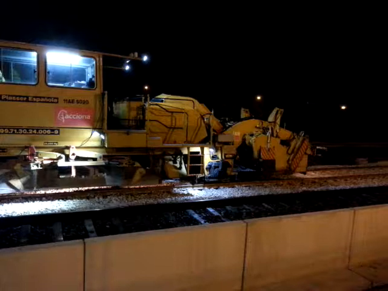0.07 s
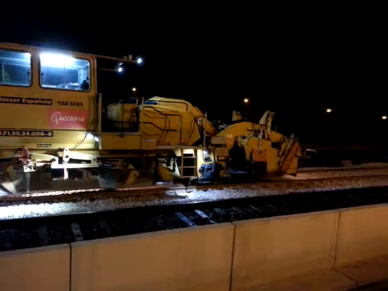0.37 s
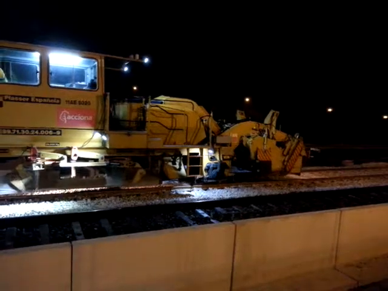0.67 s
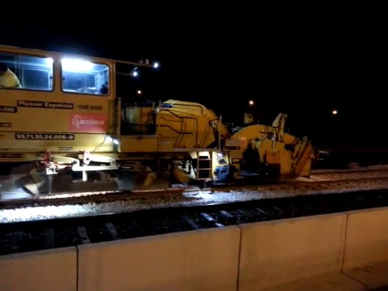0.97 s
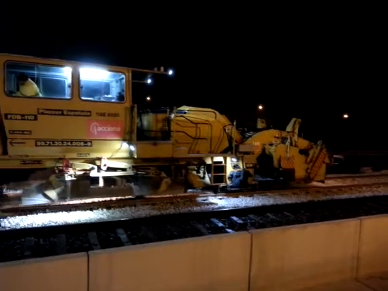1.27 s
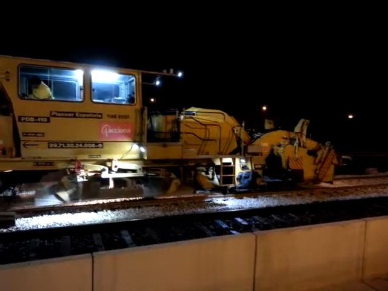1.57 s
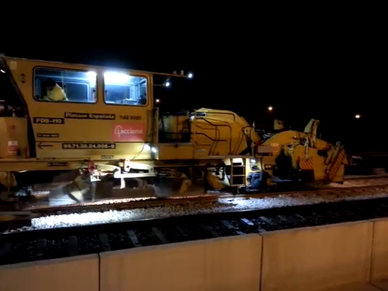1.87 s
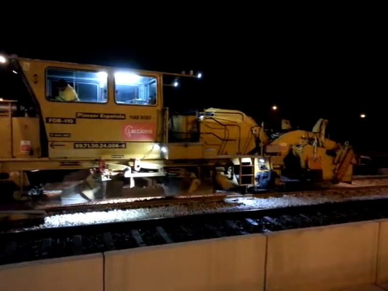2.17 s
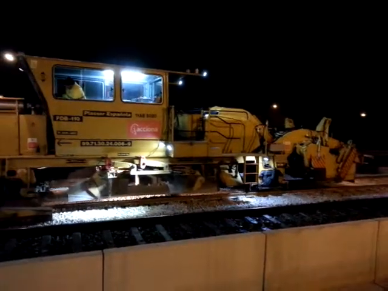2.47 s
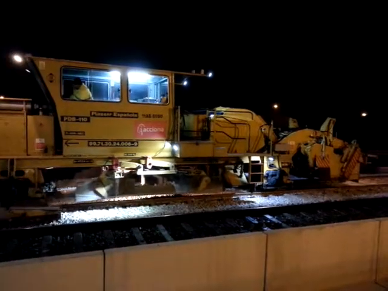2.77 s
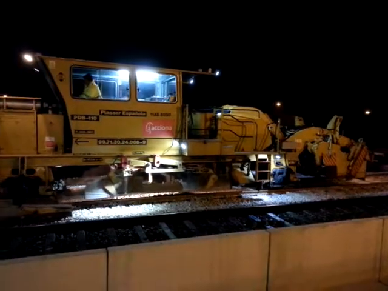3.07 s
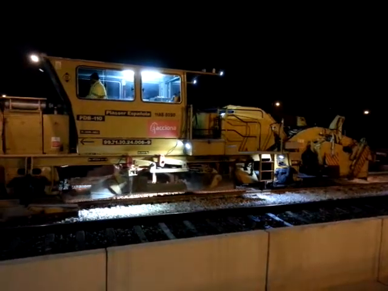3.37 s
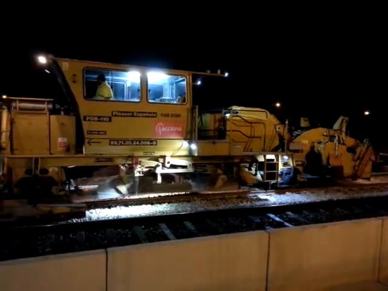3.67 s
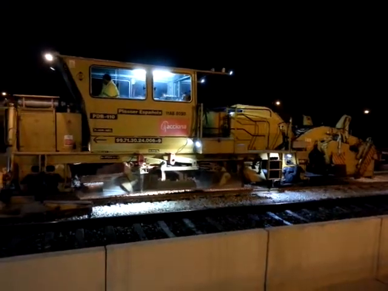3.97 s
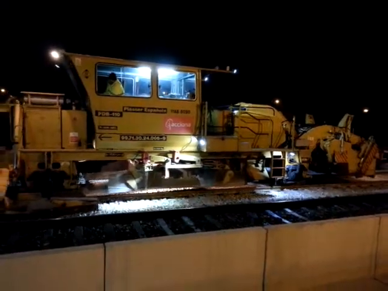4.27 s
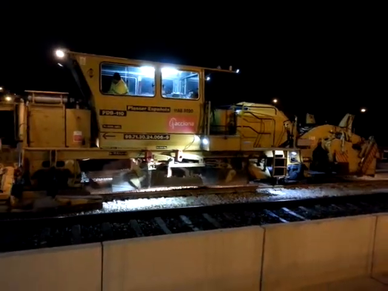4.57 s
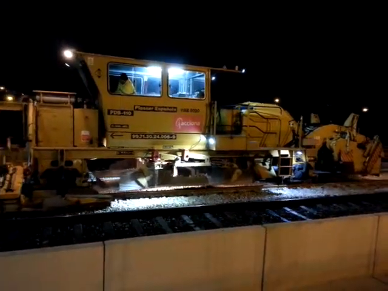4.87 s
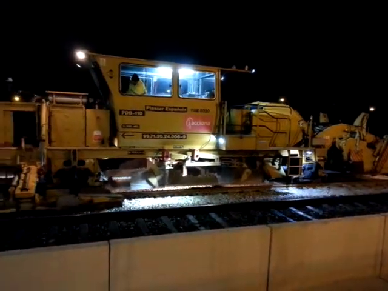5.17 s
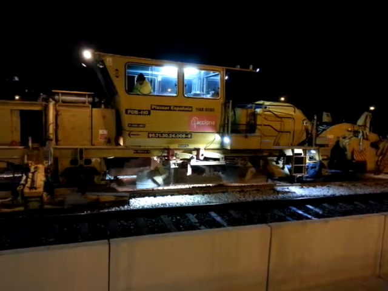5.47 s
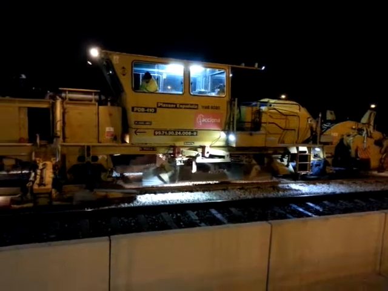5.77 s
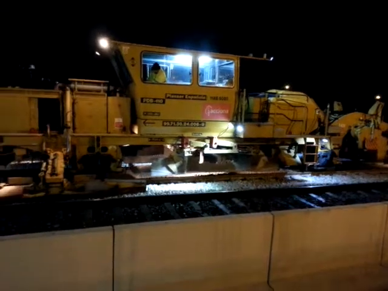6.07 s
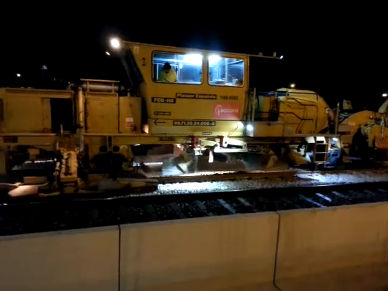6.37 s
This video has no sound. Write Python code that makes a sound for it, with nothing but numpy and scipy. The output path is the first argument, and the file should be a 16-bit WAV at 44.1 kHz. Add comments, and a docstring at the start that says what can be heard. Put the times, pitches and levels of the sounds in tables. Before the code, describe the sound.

After silence, a ballast sweeping machine fades in quickly at about 0.6 seconds and stays loud until the end at around 6.5 seconds. Its diesel runs at a steady speed, knocking and ticking, with wavering gear whine and humming pumps. A rotary brush flings stones into a steel hood, making a dense roar with a bright spray on top. From 1 second a hydraulic hiss crests, then dies away over the next two seconds. Larger stones thump and clank irregularly, hardest near 1.8 seconds and in a cluster around 3. Short scrapes on steel come near 1.2, 4.2 and 5.7 seconds. The hood booms near 3.5 seconds, and deep tumbling swells around 3 and 4.4. Cooling air sings hoarsely in a grille, strongest at 6 seconds as the engine draws level. The sound is outdoors, in stereo, drifting slightly toward the middle, with clipping on the peaks.

```python
"""A ballast sweeper creeps past two microphones at night. At 0.6 s the sound fades in: a governed twelve-
cylinder diesel knocks, ticks and whines, pumps hum, a rotary brush flings stones into its steel hood. The
roar's peaks clip. From 1 s a hydraulic valve's hiss crests and dies away, while single stones thump and scrape
on steel. The hood's largest panel booms near 3.5 s, deep tumbling swells near 2.9 s and 4.4 s, and cooling air
sings in the grille as the engine draws level at 6 s."""
import sys
import numpy as np
from scipy import signal
from scipy.fft import rfft, irfft, next_fast_len
from scipy.io import wavfile

SR = 44100
rng = np.random.default_rng(int(sys.argv[2]) if len(sys.argv) > 2 else 0)


def wav_record(signal):
    """Record a signal, one row per channel, as 16-bit PCM in the file named by sys.argv[1]."""
    frames = np.transpose(np.atleast_2d(signal))
    bounded = np.clip(frames, -1, 1)
    # unit amplitude maps onto the largest positive 16-bit level
    quanta = np.round(bounded * 32767).astype(np.int16)
    wavfile.write(sys.argv[1], SR, quanta)


N = 292383
TIME_S = np.arange(N) / SR
FREQ_HZ = np.maximum(np.arange(N // 2 + 1) * SR / N, 1)

# grille air resonances: pitch_hz, width_hz, relative_db
GRILLE_MODES = [(1244, 26, -2), (1307, 43, 0), (1470, 34, 1)]
# valve and pipe resonances: pitch_hz, width_hz, relative_db
VALVE_MODES = [(2150, 180, 2.5), (2424, 150, 4), (2930, 93, 0), (4320, 310, 0.5), (5470, 170, 1.5),
               (5460, 940, -2)]
# governed diesel speed: time_s, speed_rpm
ENGINE_SPEED = [(1, 1581.4), (1.8, 1580.9), (2.3, 1579), (2.9, 1577.6), (3.8, 1576.9), (5.1, 1575.9),
                (6.5, 1577.4)]
# exhaust and gear tones: multiple_of_cycle, relative_db, peak_s, fall_db_per_s
ENGINE_ORDERS = [(5, -40, 4, 0), (6, -29.7, 3.2, .7), (7, -36.5, 6, 1), (8, -39, 5, .5), (10, -43, 5.5, 1),
                 (13, -37, 4.4, 1.3), (14, -36.5, 5.5, 1.3), (30, -39, 5.5, 1.5), (34, -37.5, 1.5, 1.5),
                 (36, -33, 4, .3), (42, -35, 5.8, .7), (43, -36.5, 5.5, 3), (47, -33, 3.6, 3),
                 (48, -33, 5.4, 4), (49, -27.5, 3.35, 3), (50, -33, 3.7, 3), (52, -35, 3.5, 1),
                 (53, -34, 2, 3), (55, -30.3, 5, 2.3), (57, -33, 2.2, 2), (60, -34, 5.5, 3),
                 (62, -32, 1.8, 4), (63, -31.2, 4.2, 1.2), (65, -30, 1.1, 6), (72, -35.5, 2, .3),
                 (75, -35, 2.6, 1), (78, -36, 4, .5), (79, -36, 4.7, 1), (83, -34.5, 2.8, 1),
                 (84, -34.5, 5.8, 2), (88, -32.5, 1.8, 3.5), (90, -31.3, 5.2, 1.7), (92, -29, 4.6, 3),
                 (93, -32, 3.2, 1.3), (94, -30.5, 6.3, 3), (105, -22.8, 5.65, 6.5), (106, -24.3, 5.2, 2.7),
                 (120, -32, 3.6, 1.5), (129, -29.5, 5, .3), (130, -29.8, 3.5, .8), (131, -28.7, 3.8, 1.7),
                 (154, -32, 4.6, 1.5)]
# loudest gear whine: time_s, relative_db
WHINE_LEVEL = [(1, -29), (1.3, -34), (1.8, -27), (1.98, -19.5), (2.42, -24), (2.75, -20.5), (3.15, -33),
               (3.8, -22), (4.05, -33), (4.6, -26), (4.85, -36), (5.27, -23.5), (5.6, -31), (6.3, -25.5),
               (6.6, -30)]
# main pump tone: time_s, relative_db
MAIN_PUMP_LEVEL = [(1.6, -42), (2.07, -32), (2.3, -39), (2.6, -33), (3.55, -30.5), (3.9, -36), (4.4, -30),
                   (4.7, -30.5), (4.93, -25.3), (5.3, -30.5), (5.58, -26.5), (5.75, -31.5), (5.95, -30.5),
                   (6.3, -36)]
# small pump tones: pitch_hz, relative_db, peak_s, fall_db_per_s
SMALL_PUMPS = [(227.5, -42, 4, 1), (271.9, -35, 3.1, 3), (292.6, -42, 4, 1)]
# ground and wall echoes bend the lag of low tones: pitch_hz, lag_factor
ECHO_LAG = [(80, -4.5), (200, -.3), (470, .75), (830, .55), (1200, .95), (1550, .85), (1800, 1)]
# injectors and valve gear: pitch_hz, width_hz, relative_db, peak_s
INJECTOR_MODES = [(3410, 220, -5.5, 9.7), (3580, 330, 2, 7.6), (4123, 210, 1, 4.6), (4820, 340, -2, 1.5),
                  (5340, 120, -6, 7.1)]
# engine covers: pitch_hz, width_hz, relative_db, peak_s
COVER_MODES = [(429, 64, -11.5, 5), (628, 190, -8, 3.8), (930, 310, -9, 0.75), (1260, 156, 0.5, 8.2),
               (1394, 52, -4, 5.1), (1540, 91, -0.5, 1.5), (1675, 98, -4, 0.82), (1873, 69, -5, 9.1),
               (2007, 110, 0, 12.8)]
# stones rub on steel: peak_s, half_length_s, pitch_hz, level_db
STONE_SCRAPES = [(1.2, 0.24, 2380, -22), (1.3, 0.42, 4200, -27), (2.68, .1, 3650, -25),
                 (3.198, 0.076, 3580, -23), (4.2, 0.12, 3560, -21), (4.24, 0.064, 1395, -13),
                 (4.296, 0.1, 4070, -22), (4.753, 0.089, 4170, -22), (5.63, 0.045, 4730, -24),
                 (5.7, 0.36, 1760, -17)]
# large stones hit the hood: peak_s, thud_db, thud_pitch_factor, clank_db
STONE_HITS = [(1.03, -20, 0.92, -30), (1.77, -28, 1, -20), (1.804, -16, 1.06, -12), (1.884, -25, 1, -15),
              (2.076, -23, 1, -12), (2.335, -18.5, 1.1, -17), (2.79, -20, 0.75, -26),
              (2.885, -21, 1.11, -22), (2.945, -17, 0.93, -18), (3.215, -23, 0.9, -21),
              (3.32, -19, 0.68, -26), (3.4, -24, .85, -24), (4.355, -20, 0.85, -22),
              (5.126, -23, 0.97, -18), (5.462, -24, 1.05, -18), (5.584, -18, 1.08, -27),
              (6.426, -20, 1, -24), (6.571, -28, 0.78, -19)]
# hood panels: pitch_hz, relative_db
PANEL_MODES = [(195, -6), (269, -0.5), (392, -5.5)]
# brush bites into heaps: peak_s, half_length_s, roar_lift_db, tumble_lift_db, spray_lift_db
BALLAST_HEAPS = [(.95, 0.096, 1.5, -3, -0.5), (1.5, 0.022, -1, -10, 4), (1.85, 0.21, 2.2, 0, 1.6),
                 (2.92, 0.11, 0, 6, -1), (3.297, 0.14, -0.5, 3, -0.5), (4.218, 0.073, 0, 1.5, 1),
                 (4.357, 0.061, 2, 5, -0.5), (4.68, 0.14, 0.5, -0.5, 1), (5.62, .03, -2, -3, 2.5),
                 (6.53, 0.13, 1.5, 2, .5)]
# spectra of the flung ballast: frequency_hz, relative_db
ROAR_SPECTRUM = [(25, -30), (110, -13.5), (300, -8.5), (400, -7.5), (530, -3), (640, 1.5), (820, 1.5),
                 (1050, -7), (1300, -9), (1850, -5), (2100, -2), (2400, -5), (2900, -37), (5000, -13),
                 (16000, -46)]
SPRAY_SPECTRUM = [(300, -32), (1500, 1), (2400, 6.5), (3000, 7), (4500, 1.5), (6500, -0.5), (8000, -5),
                  (10000, -10.5), (11500, -12), (12700, -14.5), (14500, -16), (16000, -30)]
TUMBLE_SPECTRUM = [(25, -36), (48, -24), (64, -3), (100, -17), (125, -15.5), (175, -2), (275, 0.5),
                   (350, -3.5), (500, -33), (1500, -42)]
# microphone port colour: frequency_hz, left_db, right_db
PORT_RESPONSE = [(60, -2.5, 0), (131, 3.5, 0.6), (398, 2.5, 1.9), (650, -1, 0.5), (1005, 3, 0.1),
                 (1200, -1.5, -0.5), (1726, 3, -0.5), (2140, 3, 2.5), (2660, 0.5, -2), (3280, -2, -0.5),
                 (4270, -1.5, 2.5), (4840, -1, 2), (5700, -2, -0.7), (8900, -0.5, 3)]

# the left microphone's lag shrinks as each part creeps toward the middle
ENGINE_LAG_MS = 0.32 - 0.022 * TIME_S
ROAR_LAG_MS = 0.28 - 0.023 * TIME_S
TREBLE_LAG_MS = 0.335 - 0.015 * TIME_S


def undb(db):
    """Decibels to gain."""
    return 10 ** (np.asarray(db) / 20)


def level(x, rms_db=0):
    """Scale to an rms level."""
    return x * undb(rms_db) / np.sqrt(np.mean(x ** 2))


def curve(table):
    """A (time_s, value) table, one value a sample."""
    return np.interp(TIME_S, *np.transpose(table))


def wander(turns_per_s):
    """Straight lines between random values."""
    turns_s = np.arange(0, TIME_S[-1] + 1, 1 / turns_per_s)
    return 0.9 * np.interp(TIME_S, turns_s, rng.standard_normal(len(turns_s)))


def swell(peak_s, half_s):
    """Bell curve, 1 at its top."""
    return np.exp(-((TIME_S - peak_s) / half_s) ** 2)


def strike(t_s, rise_s, decay_s):
    """Envelope of a blow that peaks at t_s = 0."""
    return np.exp(-np.maximum(-t_s / rise_s, t_s / decay_s))


def facing_db(peak_s, fall_db_per_s):
    """Drop from the moment a part faces the microphones."""
    return -fall_db_per_s * (np.hypot(TIME_S - peak_s, .5) - .5)


def passing_db(away_db, lift_db, peak_s, half_s):
    """Level of a part that radiates sideways as it is carried past."""
    return away_db + lift_db * swell(peak_s, half_s)


def colour(points):
    """Response through (frequency_hz, gain_db) points."""
    hz, db = np.transpose(points)
    return undb(np.interp(np.log(FREQ_HZ), np.log(hz), db))


def resonance(hz, width_hz):
    """Response of a steep-sided resonance."""
    return 1 / (1 + ((FREQ_HZ ** 2 - hz ** 2) / (1.4 * FREQ_HZ * width_hz)) ** 2)


def shape(x, response):
    """Filter by a response, to unit rms."""
    size = next_fast_len(N, real=True)
    gain = np.interp(np.arange(size // 2 + 1) * SR / size, FREQ_HZ, response)
    return level(irfft(rfft(x, size) * gain, size)[..., :N])


def path_noise():
    """White noise on three paths."""
    return rng.standard_normal((3, N))


def stereo(paths, lag_ms, direct_share, pan_db=0):
    """Three paths to two microphones: one direct, late on the left, and one scattered to each."""
    late = np.interp(TIME_S - lag_ms / 1000, TIME_S, paths[0])
    pair = np.sqrt(direct_share) * np.array([late, paths[0]]) + np.sqrt(1 - direct_share) * paths[1:]
    return pair * undb(np.array([[pan_db], [-pan_db]]) / 2)


def blows(cycles, count, decay_slots, uneven_db):
    """Envelope of count evenly spaced blows a cycle, each with its own strength."""
    strength = undb(uneven_db * rng.standard_normal(count))
    slot = cycles * count
    return level(strength[slot.astype(int) % count] * np.exp(-(slot % 1) / decay_slots))


def rattle(cycles, repeat_share, size=4096):
    """Vibration on three paths; a share repeats every engine cycle."""
    one_cycle = level(irfft(np.exp(2j * np.pi * rng.random((3, size // 2 + 1)))))
    repeating = one_cycle[:, (cycles * size).astype(int) % size]
    return np.sqrt(repeat_share) * repeating + np.sqrt(1 - repeat_share) * path_noise()


def ring_steel(force, modes, sag_share, wander_db=0.8):
    """Steel parts ring as they slide by; levels wander, pitches sink."""
    progress, out = TIME_S / TIME_S[-1], 0
    for hz, width_hz, db, peak_s in modes:
        early = shape(force, resonance(hz * (1 + sag_share / 2), width_hz))
        late = shape(force, resonance(hz * (1 - sag_share / 2), width_hz))
        gain = undb(db + facing_db(peak_s, fall_db_per_s=1) + wander_db * wander(7))
        out = out + level((1 - progress) * early + progress * late) * np.sqrt(width_hz) * gain
    return level(out)


def stones(hits_per_s, scatter_db, ring_s):
    """Stone impacts of unequal size, each a short crack, on three paths."""
    hits = (rng.random(N) < hits_per_s / SR) * undb(scatter_db * np.minimum(rng.exponential(size=N), 5))
    energy = signal.lfilter([1], [1, -np.exp(-2 / (ring_s * SR))], hits ** 2)
    return np.sqrt(energy) * path_noise()


def grille():
    """Cooling air sings hoarsely in the grille, louder as the engine draws level."""
    air = stereo(path_noise(), ENGINE_LAG_MS, direct_share=0.99)
    response = sum(undb(db) * resonance(hz, width_hz) for hz, width_hz, db in GRILLE_MODES)
    return shape(air, response) * undb(passing_db(away_db=-35, lift_db=13, peak_s=6, half_s=2))


def valve(delay_s_per_octave=0.44):
    """Oil hisses through the brush's valve; higher pipe resonances beam further forward and peak later."""
    flow = stereo(path_noise(), TREBLE_LAG_MS, direct_share=0.58, pan_db=-11.5)
    widest_hz = max(width_hz for _, width_hz, _ in VALVE_MODES)
    out = 0
    for hz, width_hz, db in VALVE_MODES:
        delay_s = delay_s_per_octave * np.log2(hz / VALVE_MODES[0][0])
        gain = undb(db + passing_db(away_db=-35, lift_db=13.5, peak_s=1 + delay_s, half_s=1.54))
        out = out + shape(flow, resonance(hz, width_hz)) * np.sqrt(width_hz / widest_hz) * gain
    return out


def shaft_tone(turns, db, waver_db=1.8, waver_rad=.3, waver_per_s=5.5):
    """One partial of a turning shaft; higher ones waver more as their echoes shift."""
    hz = turns[-1] / TIME_S[-1]
    unrest = min(hz / 400, 1)
    phase = 2 * np.pi * (turns + rng.random()) + waver_rad * unrest * wander(waver_per_s)
    rms = undb(db + waver_db * unrest * wander(waver_per_s))
    lag_s = np.interp(hz, *np.transpose(ECHO_LAG)) * ENGINE_LAG_MS / 1000
    return np.sqrt(2) * rms * np.sin([phase - 2 * np.pi * hz * lag_s, phase])


def machine_tones(cycles, whine_order=118, main_pump_hz=489.6, gain_db=0.2):
    """Exhaust and gear tones follow the engine; the pumps hold their pitch."""
    lines = [(order * cycles, db + facing_db(*facing)) for order, db, *facing in ENGINE_ORDERS]
    lines += [(hz * TIME_S, db + facing_db(*facing)) for hz, db, *facing in SMALL_PUMPS]
    lines += [(whine_order * cycles, curve(WHINE_LEVEL)), (main_pump_hz * TIME_S, curve(MAIN_PUMP_LEVEL))]
    return undb(gain_db) * sum(shaft_tone(turns, db) for turns, db in lines)


def injectors(cycles, throb_depth=0.049):
    """Twelve ticks a cycle ring small steel parts, surging three times a cycle."""
    ticks = blows(cycles, count=12, decay_slots=1.9, uneven_db=-0.2)
    surges = blows(cycles, count=3, decay_slots=2.6, uneven_db=1.66)
    force = ticks * surges * (1 + throb_depth * np.sin(2 * np.pi * cycles))
    shaking = stereo(force * rattle(cycles, repeat_share=0.078), TREBLE_LAG_MS, direct_share=0.52)
    gain = undb(passing_db(away_db=-17.5, lift_db=1, peak_s=3, half_s=10))
    return ring_steel(shaking, INJECTOR_MODES, sag_share=0.02) * gain


def diesel_knock(cycles, throb_depth=0.048, level_db=-12.5):
    """Twelve firings a cycle ring the engine covers; the sum throbs once a cycle."""
    firings = blows(cycles, count=12, decay_slots=3.2, uneven_db=0.39)
    force = firings * (1 + throb_depth * np.sin(2 * np.pi * cycles))
    shaking = stereo(force * rattle(cycles, repeat_share=0.4), ENGINE_LAG_MS, direct_share=0.83)
    return ring_steel(shaking, COVER_MODES, sag_share=0.0061) * undb(level_db)


def scrapes(width_hz=160):
    """Stones judder along steel; each rings one part while it rubs."""
    judder = stereo(stones(hits_per_s=220, scatter_db=2, ring_s=.008), TREBLE_LAG_MS, direct_share=0.9)
    return sum(shape(judder, resonance(hz, width_hz)) * undb(db) * swell(peak_s, half_s)
               for peak_s, half_s, hz, db in STONE_SCRAPES)


def thumps():
    """Large stones strike the hood: a pitched panel thud and a rough steel clank."""
    thuds, clank_envelope = np.zeros(N), np.zeros(N)
    for peak_s, thud_db, pitch_factor, clank_db in STONE_HITS:
        near = np.abs(TIME_S - peak_s) < .2
        t_s = TIME_S[near] - peak_s
        ring = sum(undb(db) * np.sin(2 * np.pi * (hz * pitch_factor * t_s + rng.random()))
                   for hz, db in PANEL_MODES)
        thuds[near] += level(ring, thud_db) * strike(t_s, rise_s=0.0093, decay_s=0.017)
        clank_envelope[near] += undb(clank_db) * strike(t_s, rise_s=.004, decay_s=0.02)
    clank = shape(path_noise(), resonance(hz=710, width_hz=350))
    return thuds + clank_envelope * stereo(clank, ROAR_LAG_MS, direct_share=0.81)


def hood_resonances(roar, modes_hz=(616, 705, 794, 870), width_hz=53, wander_db=2.5):
    """The hood's strongest resonances come and go as stones land in changing places."""
    spectrum = rfft(roar)
    bands = (irfft(spectrum * resonance(hz, width_hz), N) for hz in modes_hz)
    return level(roar + sum(band * (undb(wander_db * wander(9)) - 1) for band in bands))


def brush():
    """The brush flings ballast: hood roar, bright spray, deep tumbling and a booming panel."""
    roar = shape(stones(hits_per_s=1400, scatter_db=2, ring_s=0.0082), colour(ROAR_SPECTRUM))
    roar = stereo(roar, ROAR_LAG_MS, direct_share=0.91)
    spray = shape(stones(hits_per_s=2500, scatter_db=2, ring_s=.005), colour(SPRAY_SPECTRUM))
    spray = stereo(spray, TREBLE_LAG_MS, direct_share=.1)
    tumble = shape(stones(hits_per_s=400, scatter_db=1, ring_s=0.016), colour(TUMBLE_SPECTRUM))
    tumble = stereo(tumble, lag_ms=0, direct_share=0.88)
    boom = shape(path_noise(), resonance(hz=143, width_hz=73))
    boom = stereo(boom, lag_ms=0, direct_share=0.55)
    roar = hood_resonances(roar)
    roar_db, tumble_db, spray_db = sum(np.outer(lifts_db, swell(peak_s, half_s))
                                       for peak_s, half_s, *lifts_db in BALLAST_HEAPS)
    roar_db += passing_db(away_db=-17.5, lift_db=1, peak_s=0.9, half_s=0.5) + 0.26 * wander(14)
    spray_db += passing_db(away_db=-14, lift_db=1, peak_s=1.5, half_s=1) + 0.9 * wander(9.9)
    tumble_db += passing_db(away_db=-27, lift_db=0, peak_s=5, half_s=2.5)
    boom_db = passing_db(away_db=-40.5, lift_db=12.5, peak_s=3.5, half_s=0.8)
    return roar * undb(roar_db) + spray * undb(spray_db) + tumble * undb(tumble_db) + boom * undb(boom_db)


def scene():
    """Engine, hydraulics and brush on one slow machine."""
    cycles = np.cumsum(curve(ENGINE_SPEED) / 120) / SR  # four-stroke: two turns a cycle
    engine = diesel_knock(cycles) + injectors(cycles)
    return engine + machine_tones(cycles) + grille() + brush() + thumps() + scrapes() + valve()


def record(dry, fade_start_s=.616, fade_s=.295, drive_db=1, ceiling=0.93, low_hz=48, top_hz=15100):
    """Port colour, fade-in, hard clip, band limit."""
    ports = np.array(PORT_RESPONSE)
    coloured = irfft(rfft(dry) * [colour(ports[:, [0, 1]]), colour(ports[:, [0, 2]])], N)
    fade_in = np.interp(TIME_S - fade_start_s, [0, fade_s], [.03, 1], left=0)
    clipped = np.clip(coloured * fade_in * undb(drive_db), -ceiling, ceiling)
    low_cut = signal.sosfilt(signal.butter(2, low_hz, "high", fs=SR, output="sos"), clipped)
    return signal.sosfilt(signal.ellip(10, .1, 70, top_hz, fs=SR, output="sos"), low_cut)


dry = scene()
out = record(dry)
wav_record(out)
```